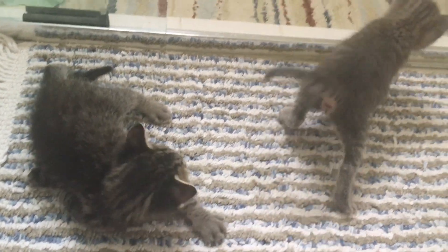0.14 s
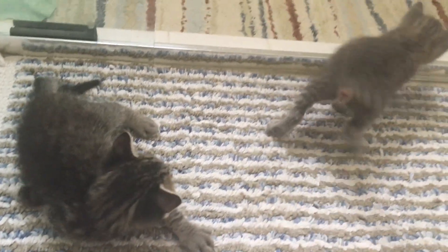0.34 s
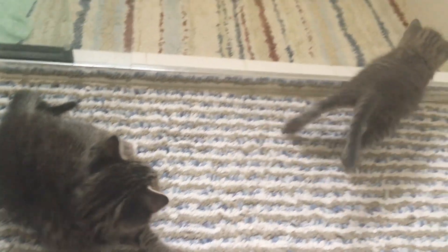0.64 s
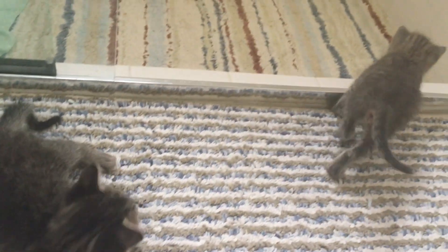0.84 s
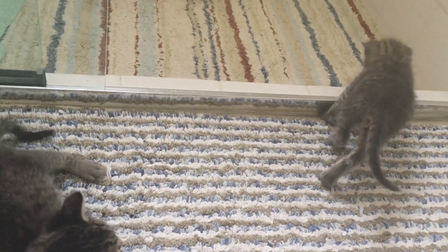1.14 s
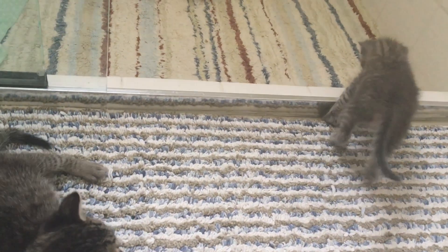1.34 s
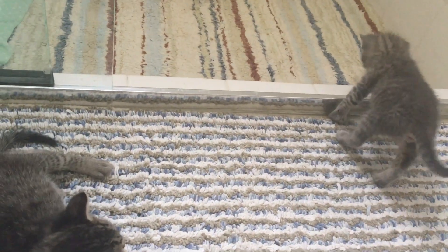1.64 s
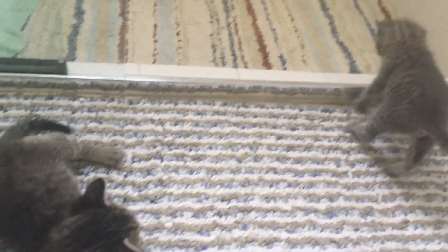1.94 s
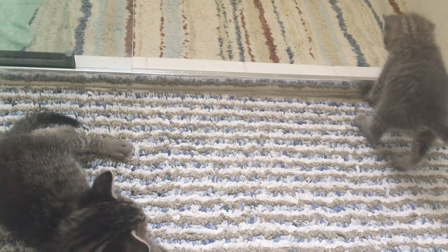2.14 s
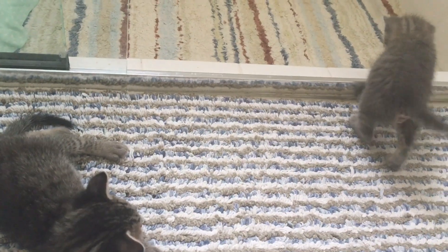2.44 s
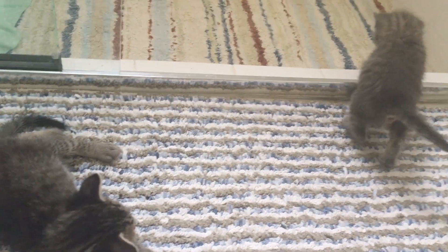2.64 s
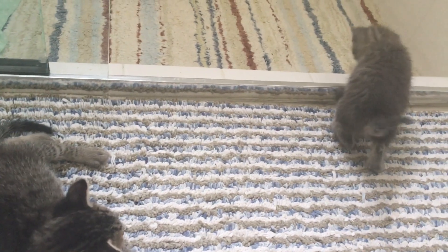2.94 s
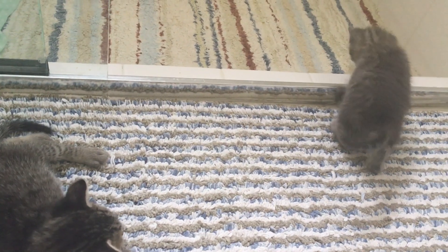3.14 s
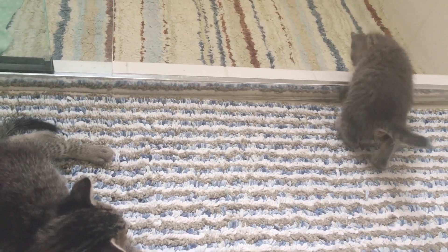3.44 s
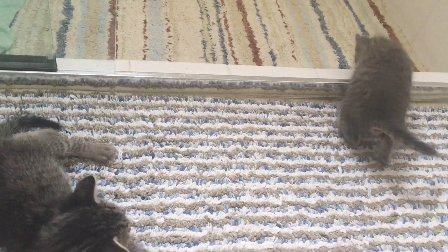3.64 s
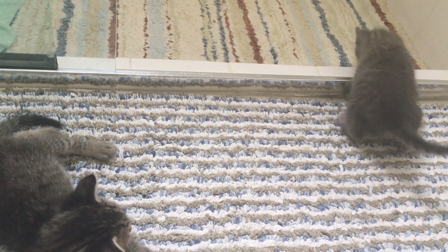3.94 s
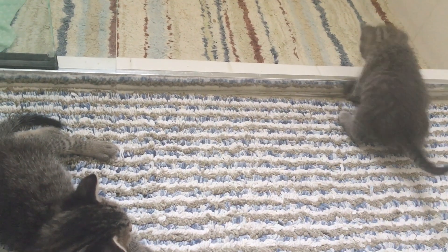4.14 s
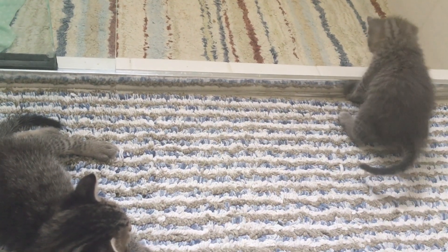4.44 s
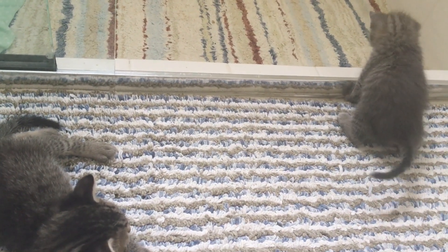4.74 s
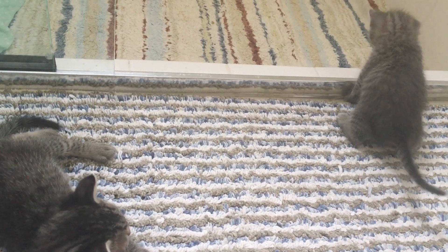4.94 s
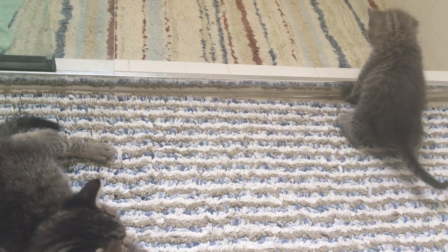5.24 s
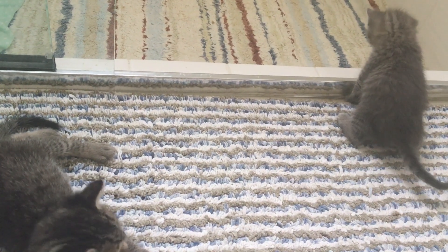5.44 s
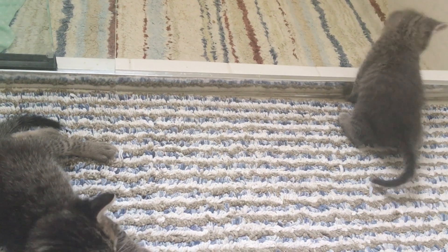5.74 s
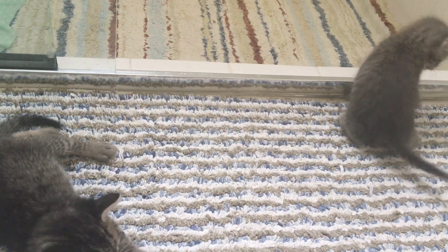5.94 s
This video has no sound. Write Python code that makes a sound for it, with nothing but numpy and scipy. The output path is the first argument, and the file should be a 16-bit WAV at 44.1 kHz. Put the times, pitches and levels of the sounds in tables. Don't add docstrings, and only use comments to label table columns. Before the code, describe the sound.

Close to the floor in a small, fairly live room, kittens play on a loop-pile rug. Long soft rubs come first, then a quick cluster of paw taps and skids, claws plucking at the loops and dull thuds in the boards. A steady low hum continues while a distant heavy engine swells and recedes, dropping in pitch. The end is sparse, with light claw ticks.

```python
import sys
import numpy as np
from scipy import signal
from scipy.fft import rfft, irfft, next_fast_len
from scipy.io import wavfile

SR = 44100
rng = np.random.default_rng(int(sys.argv[2]) if len(sys.argv) > 2 else 0)


def natural_amplitude(level_db):
    exponent = np.asarray(level_db, float) / 20
    return 10 ** exponent


def store_wav(level_fs):
    pcm = np.round(np.clip(np.atleast_2d(level_fs), -1, 1) * 32767)
    wavfile.write(sys.argv[1], SR, pcm.T.astype(np.int16))


N = 268128


def rms_one(x):
    return x / np.sqrt(np.mean(x ** 2) + 1e-20)


def in_time(rows):
    s, *columns = np.transpose(rows)
    return [np.interp(np.arange(N) / SR, s, c) for c in columns]


def at_hz(points, hz):
    table_hz, values = np.transpose(points)
    return np.interp(np.log(np.maximum(hz, 1)), np.log(table_hz), values)


def colour(x, spectrum):
    size = next_fast_len(N + SR // 4)
    gain = natural_amplitude(at_hz(spectrum, np.fft.rfftfreq(size, 1 / SR)))
    cepstrum = irfft(np.log(gain), size)
    cepstrum[1:size // 2] *= 2
    cepstrum[size // 2 + 1:] = 0
    return irfft(rfft(x, size) * np.exp(rfft(cepstrum)), size)[:N]


def drift(rate_hz):
    r = np.exp(-80 * np.pi * rate_hz / SR)
    slow = signal.lfilter([1], [1, -2 * r, r * r], rng.standard_normal(N // 40 + 2002))[2000:]
    return np.interp(np.arange(N) / 40, np.arange(len(slow)), rms_one(slow))


def resonate(x, hz, width_hz):
    r = np.exp(-np.pi * width_hz / SR)
    poles = [1, -2 * r * np.cos(2 * np.pi * hz / SR), r * r]
    return signal.lfilter((1 - r * r) / 2 * np.array([1, 0, -1]), poles, x + 1e-18)


def hump(s, rise, fall, roundness):
    t = np.arange(N) / SR - s
    stretched = np.where(t < 0, t / max(rise, .002), t / max(fall, .002))
    return np.exp(-np.abs(stretched) ** roundness)


def swells(rest_db, rows):
    return natural_amplitude(rest_db) + sum(natural_amplitude(db) * hump(s, half, half, 2.0) for s, db, half in rows)


def fibres(per_s, spread_db, clump_db):
    strength = natural_amplitude(spread_db * np.minimum(rng.exponential(1, N), 4)) * rng.choice([-1, 1], N)
    let_go = rng.random(N) < per_s / SR
    return rms_one(strength * let_go * natural_amplitude(clump_db * drift(30)))


# full_pressure_s, level_db, swell_s, ease_s, hiss_over_scuff_db
RUBS = [(0.0, -53, .05, 0.095, -20), (0.25, -61, 0.19, 0.13, -12.5), (0.43, -60.5, 0.22, 0.11, -11),
        (0.71, -52, 0.15, 0.15, -12.5), (0.938, -49.5, 0.066, 0.039, -16.5),
        (1.18, -63.5, 0.03, 0.16, -7.5), (1.632, -52, 0.023, 0.039, -13.5),
        (1.831, -65.5, 0.027, 0.084, -2.5), (1.9, -52, 0.061, 0.14, -15), (2.06, -47, 0.096, 0.07, -17),
        (2.264, -53, 0.091, 0.035, -14), (2.458, -65, 0.1, 0.14, -11), (2.72, -67, 0.068, 0.062, -12.5),
        (2.805, -51.5, 0.011, 0.097, -16.5), (2.89, -46, 0.066, 0.085, -9.5), (3.2, -50, .11, 0.082, -6.5),
        (3.449, -50, 0.07, 0.063, -7.5), (3.65, -60.5, 0.37, 0.17, -15), (3.759, -60, 0.0085, 0.028, 0),
        (3.85, -75.5, 0.082, 0.28, -5.5), (4.208, -64.5, 0.018, 0.041, -6.5), (4.5, -83, 0.35, 0.15, 1),
        (4.87, -73, 0.15, 0.068, -5.5), (5.08, -70, 0.07, 0.12, -4.5), (5.44, -88.5, 0.044, 0.043, 5.5)]


def rub_power():
    power = 0
    narrowing = np.array([[1], [1], [1.25], [1]])
    for s, db, swell, ease, hiss_db in RUBS:
        drag_db, thud_db = 8 + 0.64 * hiss_db, -5.5
        mix = natural_amplitude(db + np.array([[0], [drag_db], [hiss_db], [thud_db]]))
        power = power + (mix * hump(s, swell, ease, roundness=2.1) ** narrowing) ** 2
    return power


# start_s, level_db, dying_s, drag_over_scuff_db, thud_over_scuff_db
SKIDS = [(0.96, -63.5, 0.21, -15, 0.5), (1.103, -49.5, 0.04, -18, -13), (1.163, -46, 0.13, -1.5, -10.5),
         (1.29, -51, 0.12, -22, -8.5), (1.534, -61.5, 0.082, -50, -2), (1.609, -51.5, 0.035, -18, -2),
         (2.33, -57.5, 0.019, 10.5, -22), (2.62, -76, 0.11, -3, 5), (2.69, -71, 0.064, -10, 4),
         (3.8, -58, 0.18, -4.5, -14), (3.96, -59, 0.49, -10, -9), (4.082, -45.5, 0.09, -12, -7),
         (4.202, -53.5, 0.11, -1, -6.5), (4.299, -51.5, 0.097, -18, -5.5), (4.451, -66, 0.042, -34, -1),
         (4.552, -59.5, 0.052, -20, -8), (4.664, -45.5, 0.069, -32, -8), (4.924, -46.5, 0.047, 7, -2.5),
         (5.177, -70.5, 0.064, 1, 4.5), (5.76, -83, .06, 1, 0), (5.83, -78, 0.024, 9, 14.5),
         (5.963, -62.5, 0.054, 6.5, 1)]


def skid_power():
    power, attack_s, hiss_db = 0, 0.0036, -32.5
    for s, db, dying, drag_db, thud_db in SKIDS:
        mix = natural_amplitude(db + np.array([[0], [drag_db], [hiss_db], [thud_db]]))
        power = power + (mix * hump(s + attack_s, attack_s / 2, dying, roundness=1.94)) ** 2
    return power


# pitch_hz, level_db per Hz
SCUFF_SPECTRUM = [(150, -38), (450, -7), (700, -2), (1000, -3.5), (1400, -6), (2000, -17), (4000, -57),
                  (9000, -68)]
# pitch_hz, level_db per Hz
DRAG_SPECTRUM = [(700, -33.5), (1300, 0), (1800, 2.5), (2400, 0.5), (2800, -5), (3700, -20), (4600, -40),
                 (9000, -58.5)]
# pitch_hz, level_db per Hz
HISS_SPECTRUM = [(1900, -15), (3300, -4.5), (3700, -2.5), (4840, -9.5), (5870, -7.5), (7040, -10),
                 (7660, -15), (8340, -12), (9310, -12.5), (10400, -19), (11500, -15), (13200, -17),
                 (14800, -19), (15700, -18.5)]
# pitch_hz, width_hz, level_db
FLOOR_MODES = [(205, 37, -8), (249, 61, -12), (283.4, 29.5, -2.5), (351.5, 30, 1.5), (415.5, 38, -5),
               (470, 46, -2.5)]


def strokes():
    power = rub_power() + skid_power()
    scuff = rms_one(colour(fibres(per_s=5000, spread_db=-0.5, clump_db=1.5), SCUFF_SPECTRUM))
    drag = rms_one(colour(fibres(per_s=5000, spread_db=1.0, clump_db=2.0), DRAG_SPECTRUM))
    hiss = rms_one(colour(fibres(per_s=12000, spread_db=-4.5, clump_db=0.74), HISS_SPECTRUM))
    push = fibres(per_s=1500, spread_db=3.5, clump_db=-1.5)
    thud = 0
    for k, (hz, width_hz, db) in enumerate(FLOOR_MODES):
        thud = thud + (-1) ** k * natural_amplitude(db) * resonate(push, hz, width_hz)
    layers = [natural_amplitude(-1.5) * scuff, natural_amplitude(-5.5) * drag, natural_amplitude(4.0) * hiss, rms_one(thud)]
    return np.sum(np.sqrt(power) * layers, axis=0)


# start_s, peak_db, centre_hz, contact_s
TAPS = [(1.097, -43, 1080, 0.017), (1.109, -45.5, 1280, 0.033), (1.161, -31.5, 784, 0.018),
        (1.192, -29, 820, 0.015), (1.188, -25.5, 980, 0.083), (1.214, -24.5, 1330, 0.015),
        (1.235, -49, 1870, 0.024), (1.265, -28.5, 1400, 0.008), (1.533, -41.5, 850, 0.019),
        (1.565, -50, 900, .015), (1.61, -39, 796, .02), (1.64, -41.5, 1190, 0.028),
        (1.992, -35.5, 1790, 0.011), (2.018, -36, 1650, 0.085), (2.192, -50, 1815, 0.04),
        (2.249, -31.5, 1430, 0.013), (2.316, -42.5, 877, 0.026), (2.331, -35, 1890, 0.005),
        (2.794, -47, 2060, 0.02), (2.827, -42, 1500, 0.023), (3.102, -45, 1320, .015),
        (3.121, -41, 1500, .015), (3.215, -44, 1320, .015), (3.38, -46, 900, .015),
        (3.403, -41, 1330, 0.014), (3.423, -40, 930, .015), (3.758, -41.5, 1190, 0.022),
        (3.938, -59, 1150, 0.018), (4.003, -48, 1280, 0.021), (4.055, -36, 1320, 0.055),
        (4.088, -39, 1530, 0.019), (4.193, -33.5, 1182, 0.029), (4.303, -40, 1436, 0.011),
        (4.34, -37, 633, 0.013), (4.369, -56, 1240, 0.028), (4.558, -56, 1185, 0.015),
        (4.666, -24.5, 740, 0.03), (4.686, -31.5, 790, 0.014), (4.924, -48, 747, 0.021),
        (4.942, -41, 790, 0.015), (5.641, -46, 3200, 0.015), (5.965, -42.5, 2280, 0.021)]
# start_s, claw_db, claw_hz, tick_db, contact_s
CLAWS = [(1.1, -65, 2900, -61, .04), (1.162, -43.5, 2900, -48, 0.026), (1.537, -57, 2420, -66, 0.11),
         (1.618, -43.5, 3360, -66, 0.025), (2.018, -62, 2900, -66, .014), (2.191, -67, 2900, -72, .034),
         (2.247, -47, 3200, -52, .014), (2.314, -50, 2850, -77, 0.013), (2.709, -75, 2900, -59, 0.025),
         (2.797, -65, 2900, -66, .02), (3.759, -62, 3500, -62, 0.019), (4.055, -53, 2940, -63, 0.037),
         (4.075, -52, 4600, -69, 0.015), (4.194, -51, 3600, -46, 0.013), (4.255, -45, 3750, -73, 0.011),
         (4.36, -76, 2900, -63, .02), (4.481, -69, 2900, -60, 0.004), (4.553, -59, 4000, -54, 0.024),
         (4.807, -45, 3320, -80, 0.014), (4.83, -39.5, 3450, -68, 0.014), (4.865, -50, 2400, -74, .03),
         (4.924, -37, 2870, -52, 0.022), (5.04, -70, 2900, -70, 0.015), (5.082, -38.5, 3440, -68, 0.012),
         (5.632, -54, 3200, -80, .016), (5.645, -49, 3330, -78, 0.016), (5.689, -57.5, 3600, -84, 0.03),
         (5.76, -60, 3600, -81, 0.01), (5.965, -43, 3000, -54, 0.016)]


def catches():
    out, t = np.zeros(N + SR), np.arange(SR // 10) / SR
    contacts = [(s, db, hz, db - 32, 2900, db - 54, contact) for s, db, hz, contact in TAPS]
    contacts += [(s, -np.inf, 1000, *claw) for s, *claw in CLAWS]
    noise = rng.standard_normal((len(contacts), 3, len(t)))
    onset = np.sin(np.pi / 2 * np.minimum(t / .004, 1)) ** 2
    claw_rise, tick_rise = np.minimum(t / 0.009, 1), np.minimum(t / 0.012, 1)
    tick_band = signal.butter(2, [4800, 15000], "band", fs=SR, output="sos")
    for contact, (tear, claw, tick) in zip(contacts, noise):
        s, peak_db, hz, claw_db, claw_hz, tick_db, contact_s = contact
        for width in (1.1, 1.3, 1.3):
            tear = resonate(tear, hz, width * hz)
        for _ in range(2):
            claw = resonate(claw, claw_hz, claw_hz)
        tick = signal.sosfilt(tick_band, tick)
        burst = natural_amplitude(peak_db) * rms_one(tear)
        burst = burst + natural_amplitude(claw_db) * rms_one(claw) * claw_rise
        burst = burst + natural_amplitude(tick_db) * rms_one(tick) * tick_rise
        dying = np.exp(-(t / max(contact_s, .002)) ** 1.04)
        i = round(s * SR)
        out[i:i + len(t)] += natural_amplitude(-8.0) * burst * dying * onset
    return out[:N]


# centre_s, level_db, pitch_hz, half_length_s
SCRAPES = [(0.42, -63, 860, .03), (0.677, -56, 860, 0.025), (0.944, -56, 890, 0.032),
           (0.97, -55, 334, 0.019), (1.619, -50.5, 950, 0.0078), (1.828, -64.5, 1050, 0.026),
           (1.849, -56, 1430, 0.012), (1.95, -53, 856, .015), (2.015, -52.5, 1800, 0.06),
           (2.108, -57, 664, 0.021), (2.199, -60, 1820, .02), (2.422, -63.5, 880, .025),
           (2.428, -66, 1330, 0.021), (2.58, -74, 520, 0.054), (2.66, -66, 695, 0.021),
           (2.688, -60, 480, 0.017), (2.715, -69.5, 1920, 0.037), (2.72, -79, 13500, .03),
           (2.808, -57.5, 2050, 0.01), (2.848, -49, 470, 0.014), (2.89, -49, 927, 0.045),
           (3.125, -63, 1950, 0.021), (3.215, -52, 1270, .02), (3.257, -53.5, 784, 0.019),
           (3.39, -63, 1580, 0.02), (3.427, -61, 1280, 0.018), (3.481, -53.5, 2030, 0.019),
           (3.742, -62, 1630, 0.014), (3.937, -66, 1240, 0.017), (4.05, -59, 1220, 0.068),
           (4.098, -47, 1510, 0.023), (4.208, -56.5, 1260, 0.021), (4.322, -54.5, 1550, 0.02),
           (4.391, -64, 2000, 0.017), (4.468, -61.5, 855, .012), (4.763, -61, 437, 0.024),
           (4.879, -67, 2380, 0.029), (4.936, -58, 700, 0.014), (4.938, -55, 3600, 0.013),
           (4.95, -74, 6300, .018), (5.042, -78, 13500, 0.015), (5.09, -80, 13600, .025),
           (5.096, -83, 6400, 0.012), (5.714, -81, 445, 0.041), (5.69, -78, 2270, 0.036),
           (5.75, -78.5, 2400, 0.025), (5.765, -78, 870, .01), (5.842, -81, 1690, 0.034),
           (5.996, -66, 3200, 0.019), (6.016, -70, 2420, 0.032)]


def scrapes():
    reach = SR // 5
    snags = np.pad(fibres(per_s=3700, spread_db=3.0, clump_db=-0.5), reach, "wrap")
    out = np.zeros(N + 2 * reach)
    t = np.arange(-reach, reach) / SR
    for s, db, hz, half in SCRAPES:
        i = round(s * SR)
        span = slice(i, i + 2 * reach)
        width_hz = 0.27 * hz
        ring = resonate(resonate(snags[span], hz, width_hz), hz, width_hz)
        out[span] += natural_amplitude(db) * np.exp(-np.abs(t / max(half, .002)) ** 1.6) * rms_one(ring)
    return out[reach:reach + N]


# start_s, peak_db, pitch_hz, push_s
THUMPS = [(0.299, -63, 217, 0.073), (1.626, -51.5, 216, 0.019), (1.902, -45.5, 295, 0.16),
          (2.029, -43, 277, 0.017), (2.142, -53, 267, 0.03), (2.841, -38.5, 228, 0.018),
          (3.208, -53, 205, 0.019), (3.436, -56.5, 235, 0.042), (2.459, -60.5, 250, 0.014),
          (3.171, -52, 181, 0.03), (4.087, -64, 230, 0.018), (4.69, -59.5, 268, 0.033)]


def thumps():
    out, t = np.zeros(N + SR), np.arange(SR // 4) / SR
    for (s, peak_db, hz, push), stir in zip(THUMPS, rng.standard_normal((len(THUMPS), len(t)))):
        pushes = t / max(push, .01)
        swell = pushes * np.exp(1 - pushes)
        grumble = rms_one(resonate(resonate(stir, hz, 70), hz, 110))
        i = round(s * SR)
        out[i:i + len(t)] += natural_amplitude(peak_db - 4.5) * grumble * swell ** 2
    return out[:N]


# centre_s, level_db, half_length_s
STIRS = [
    (0.15, -74, 0.48),
    (1.2, -81, 0.097),
    (2.3, -74, 0.56),
    (3.0, -64.5, 0.12),
    (3.3, -71, 0.21),
    (3.7, -72, 0.14),
    (4.3, -77.5, 0.5),
    (5.75, -78, 0.11),
]


def low_stir():
    hz, width_hz = 202, 129
    stir = resonate(resonate(rng.standard_normal(N), hz, width_hz), hz, width_hz)
    return swells(-82, STIRS) * rms_one(stir)


# pitch_hz, width_hz, lift_db
ROOM_PEAKS = [(690, 40, 2), (875, 60, 3.5), (1010, 40, 2), (1370, 45, 4), (1560, 60, 3), (1830, 80, 3),
              (2450, 120, 2.5), (3300, 300, 2.5)]
# pitch_hz, t60_s
ROOM_T60 = [(150, 0.25), (800, 0.44), (2100, 0.3), (5500, 0.24), (15000, 0.041)]


def room(x, wet_db):
    t, edges, tail = np.arange(SR * 7 // 10) / SR, 100 * 2 ** np.arange(0, 7.4, .5), 0
    white = rng.standard_normal((2, len(t)))
    for k, (low, high) in enumerate(zip(edges, edges[1:])):
        band = signal.sosfilt(signal.butter(2, [low, high], "band", fs=SR, output="sos"), white[k % 2])
        decay = natural_amplitude(-60 * t / at_hz(ROOM_T60, np.sqrt(low * high)))
        band = band * decay * np.minimum(t / 0.012, 1)
        tail = tail + band * np.sqrt((high - low) / (SR / 2) / np.sum(band ** 2))
    x = x + sum((natural_amplitude(db) - 1) * resonate(x, hz, width_hz) for hz, width_hz, db in ROOM_PEAKS)
    return x + natural_amplitude(wet_db) * signal.fftconvolve(x, tail)[:N]


# time_s, firing_hz, level_db
ENGINE = [(0.8, 84, -68), (1.28, 84.4, -55.5), (1.49, 85, -59), (1.68, 85.1, -48.5), (1.75, 83.9, -55.5),
          (2.09, 83, -55.5), (2.46, 80.6, -47), (2.79, 79.75, -53.5), (3.46, 77.3, -43),
          (3.58, 76.8, -44.5), (3.81, 74.8, -37.5), (4.09, 74.5, -41), (4.31, 73.8, -39),
          (5.12, 70.3, -46.5), (5.26, 68.7, -52), (5.65, 68.2, -43.5), (6.01, 67.16, -46),
          (6.08, 66.9, -48.5)]
# centre_s, level_db, half_length_s
OCTAVE_SWELLS = [
    (2.05, -60, 0.065),
    (2.4, -71, 0.3),
    (2.92, -59, 0.091),
    (3.4, -62.5, 0.2),
    (4.2, -72, 0.19),
    (5.7, -82, 0.41),
]


def engine():
    hz, db = in_time(ENGINE)
    turn = 2 * np.pi * np.cumsum(hz + 0.312 * drift(2.37)) / SR
    near = np.clip((np.arange(N) / SR - ENGINE[0][0]) / 0.22 + 1, 0, 1)
    octave = swells(-77, OCTAVE_SWELLS) * natural_amplitude(2.8 * drift(0.54))
    return np.sqrt(2) * near * (natural_amplitude(db) * np.sin(turn) + octave * np.sin(2 * turn))


# centre_s, level_db, half_length_s
UPPER_RINGS = [
    (0.69, -68, 0.15),
    (1.32, -74, 0.075),
    (1.66, -60, 0.031),
    (2.04, -45.5, 0.083),
    (2.89, -59, 0.13),
    (3.44, -58, 0.052),
    (4.47, -61, .06),
    (5.62, -67, 0.11),
]
# centre_s, level_db, half_length_s
LOWER_RINGS = [
    (0.0, -60, 0.1),
    (0.55, -68, 0.28),
    (1.799, -60, 0.17),
    (2.22, -67, .06),
    (2.59, -73, 0.044),
    (2.9, -55, 0.096),
    (3.5, -52, 0.084),
    (4.45, -73, 0.35),
    (5.96, -59, 0.11),
]


def boom():
    upper = np.sqrt(2) * np.sin(2 * np.pi * np.cumsum(100.0 + 1.12 * drift(5.0)) / SR)
    lower = resonate(resonate(rng.standard_normal(N), 68.4, 15), 68.4, 15)
    return swells(-88, UPPER_RINGS) * upper + swells(-68, LOWER_RINGS) * rms_one(lower)


def hum():
    hum_hz, hum_db = 120, -58
    turn = 2 * np.pi * hum_hz * np.arange(N) / SR + 1.42 * drift(2.45)
    return np.sqrt(2) * natural_amplitude(hum_db + 0.7 * drift(6.6)) * np.sin(turn)


# pitch_hz, level_db per Hz
AIR_SPECTRUM = [(100, -65.5), (170, -4), (194, -4.5), (258, -0.5), (369, -2), (785, -14), (879, -7.5),
                (1100, -9.5), (1610, -14), (2440, -17.5), (2780, -22.5), (3300, -21.5), (15700, -34)]
# pitch_hz, level_db per Hz
RUMBLE_SPECTRUM = [(18, -33), (34, -4), (45, 3), (80, 2), (130, 1.5), (190, -21.5), (300, -39.5)]


def quiet():
    air_db, rumble_db = -73, -64.5
    air, traffic = rng.standard_normal((2, N))
    air = natural_amplitude(air_db + 1.0 * drift(4.3)) * rms_one(colour(air, AIR_SPECTRUM))
    return air + natural_amplitude(rumble_db) * rms_one(colour(traffic, RUMBLE_SPECTRUM))


def scene():
    paws = natural_amplitude(-2.0) * room(strokes(), wet_db=-5.5) + natural_amplitude(-7.0) * room(catches(), wet_db=-4.0)
    paws = paws + room(scrapes(), wet_db=-4.0)
    floor = thumps() + low_stir()
    background = engine() + boom() + hum() + quiet()
    return (paws + floor + background)[None]


def low_pass(x):
    return signal.sosfilt(signal.butter(12, 15680, fs=SR, output="sos"), x)


def record(dry):
    steep = signal.ellip(12, .5, 60, 15740, fs=SR, output="sos")
    mix = signal.sosfilt(steep, dry)
    return low_pass(mix)


dry = scene()
out = record(dry)
store_wav(out)
```